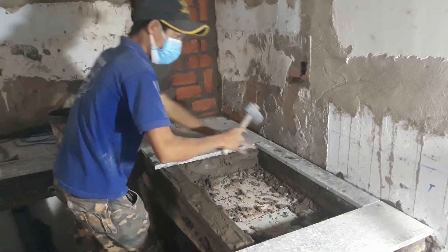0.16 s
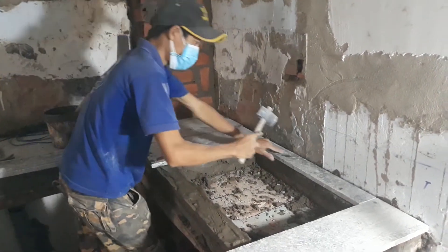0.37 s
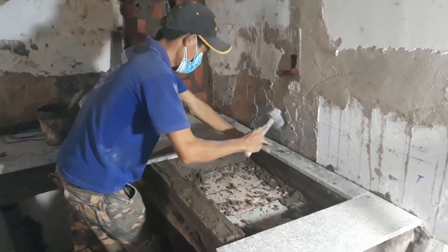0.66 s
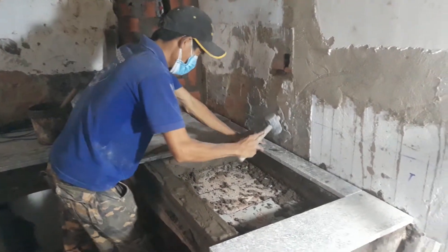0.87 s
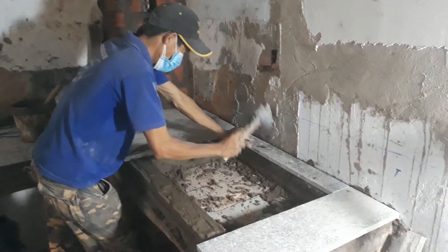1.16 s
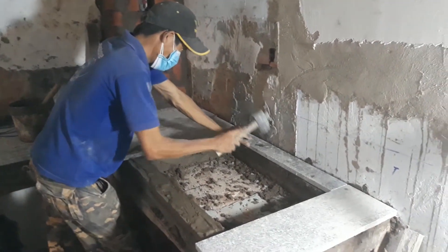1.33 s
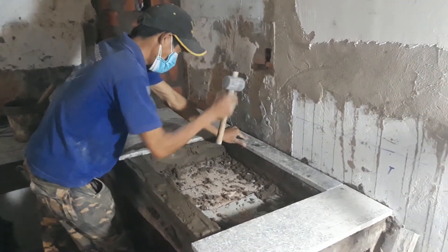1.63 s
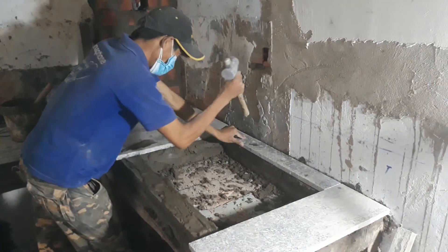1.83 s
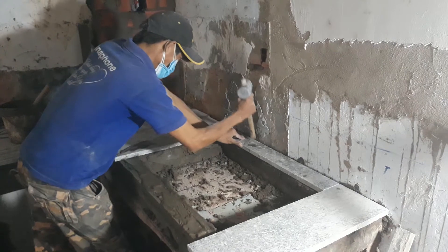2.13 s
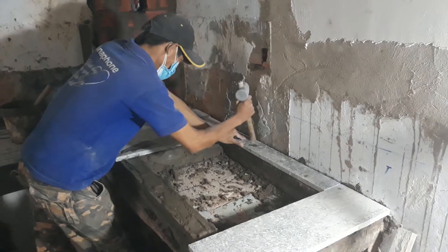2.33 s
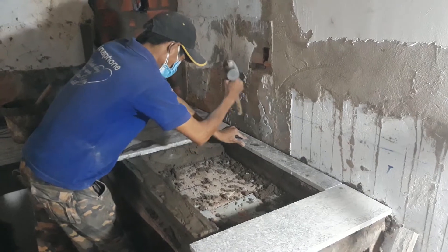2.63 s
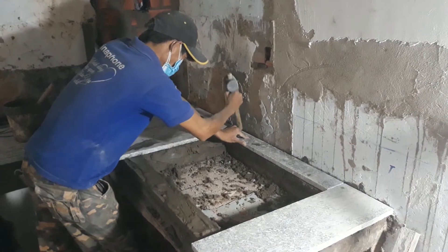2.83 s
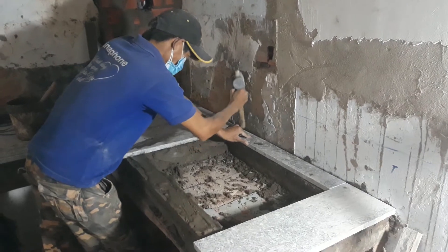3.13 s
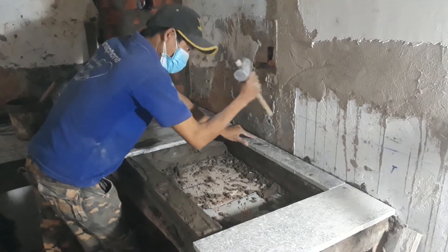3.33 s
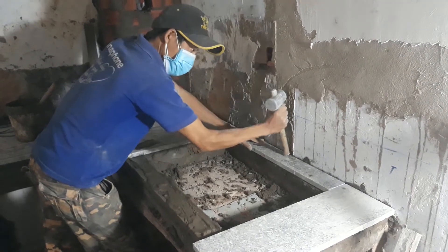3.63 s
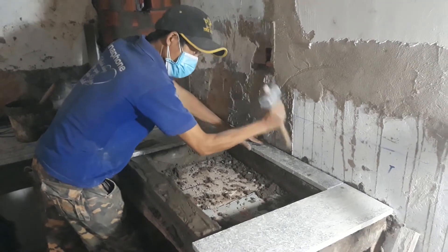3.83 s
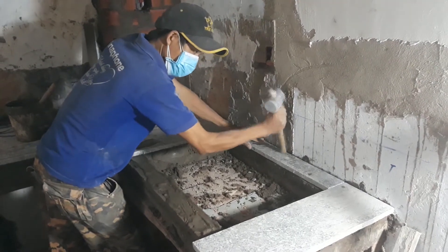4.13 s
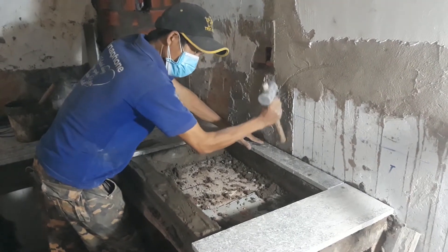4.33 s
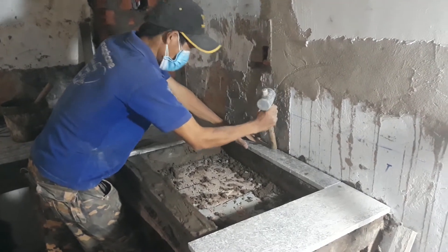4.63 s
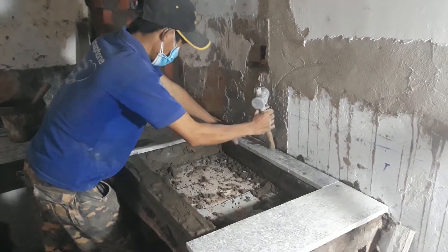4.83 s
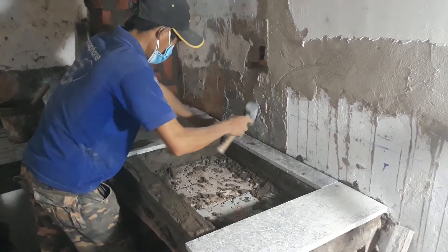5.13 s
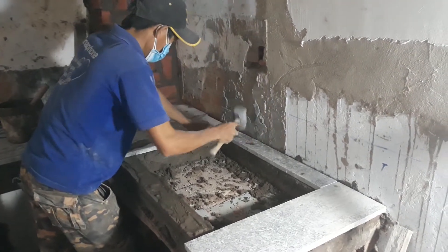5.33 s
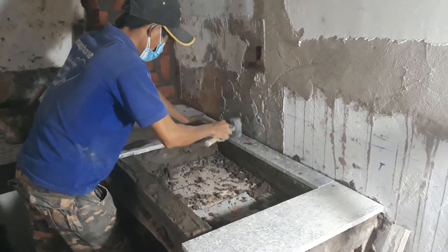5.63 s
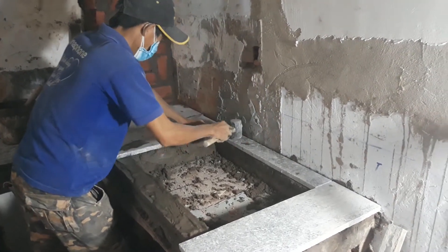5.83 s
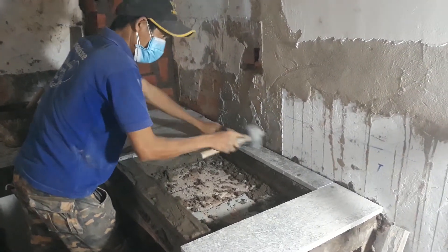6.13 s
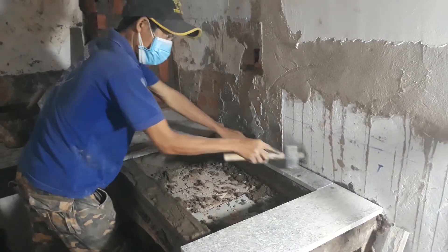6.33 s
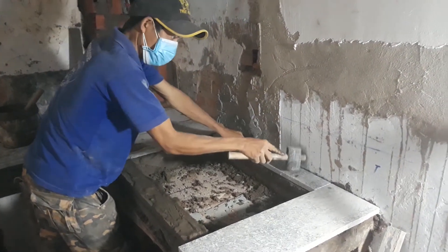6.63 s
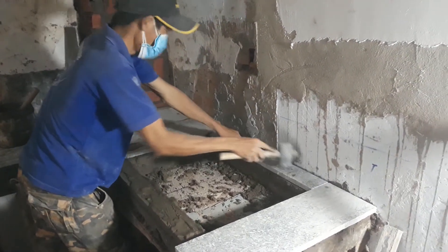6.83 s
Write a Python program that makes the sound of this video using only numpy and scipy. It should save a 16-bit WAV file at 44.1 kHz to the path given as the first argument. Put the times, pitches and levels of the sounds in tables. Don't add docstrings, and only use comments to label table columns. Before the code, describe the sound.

In a bare brick room, a hand scuffs over grit, then a stone strip lands with a hard clack and heavy settling thud. A mallet's wooden butt strikes it in about seven strong and a few lighter blows, each ringing briefly with short hard echoes. Soft dull rubber taps finish. Close microphone; faint distant machine hiss and hum dip after loud blows.

```python
import sys
import numpy as np
from scipy import signal
from scipy.fft import rfft, irfft, next_fast_len
from scipy.io import wavfile
from scipy.ndimage import uniform_filter1d, minimum_filter1d, map_coordinates

SR = 44100
rng = np.random.default_rng(int(sys.argv[2]) if len(sys.argv) > 2 else 0)


def convert_level_to_amplitude(level_db):
    exponent = np.asarray(level_db, float) / 20
    return 10 ** exponent


def bounce(signal):
    frames = np.transpose(np.atleast_2d(signal))
    limited = np.clip(frames, -1, 1)
    pcm = np.round(limited * 32767).astype(np.int16)
    wavfile.write(sys.argv[1], SR, pcm)


N = 308259
TIME = np.arange(N) / SR

# f/Hz,
# level/dB
WOOD_CLICK = [(1000, -30), (3300, -13), (4150, 0), (4900, -13), (5700, -14), (6300, -20), (7000, -17),
              (8500, -37), (10000, -62), (13500, -51), (16000, -64)]
# f/Hz, level/dB
RUBBER_CLICK = [(1000, -40), (3300, -20), (4150, -2), (4650, -7), (5250, 0), (6000, -6), (6800, -3),
                (8500, -23), (10000, -44), (13500, -23), (16000, -34)]
CLEAN_S, CRUSHED_S = 1e-5, .0015
QUICK_S, SLOW_S = .002, .02


def unit(x):
    return x / np.sqrt(np.mean(x ** 2) + 1e-20)


def along(points, hz):
    f, v = np.transpose(points)
    return np.interp(np.log(hz + 1), np.log(f + 1), v)


def wobble(rate):
    knots = rng.standard_normal(int(N * rate / SR) + 4)
    return map_coordinates(knots, [TIME * rate])


def noise(tone):
    m = next_fast_len(N + 8192)
    spectrum = rfft(rng.standard_normal(m)) * convert_level_to_amplitude(along(tone, np.fft.rfftfreq(m, 1 / SR)))
    return unit(irfft(spectrum, m)[:N])


def pulse(db, size=4096):
    ceps = irfft(np.log(convert_level_to_amplitude(db) + 1e-6), size)
    ceps[1:size // 2] *= 2
    ceps[size // 2 + 1:] = 0
    p = irfft(np.exp(rfft(ceps)), size)
    return p / np.linalg.norm(p)


def burst(seconds):
    b = rng.standard_normal(512) * np.exp(-TIME[:512] / seconds)
    return np.sign(b.sum()) * b / np.linalg.norm(b)


def room(walls_db, build_s):
    # t/s after the blow, level/dB
    first_echoes = [(.0015, 5), (.0058, 2), (0.0137, 4.5), (.021, 2.5), (.032, -0.5), (.05, -5)]
    # f/Hz, t60/s
    decay_times = [(60, 1), (150, 0.57), (400, 0.7), (1000, 0.53), (2300, 0.64), (4500, 0.47), (7000, 0.47),
                   (14000, 0.5)]
    hz, t, z = signal.stft(rng.standard_normal(SR), SR, nperseg=256)
    fading = convert_level_to_amplitude(-60 * t / along(decay_times, hz)[:, None])
    tail = signal.istft(z * fading, SR, nperseg=256)[1][:SR]
    tail *= 1 - np.exp(-TIME[:SR] / build_s)
    tail *= convert_level_to_amplitude(8.5) / np.linalg.norm(tail)
    for s, db in first_echoes:
        tail[round(s * SR):][:512] += convert_level_to_amplitude(db + walls_db) * burst(0.0025)
    return tail


def contacts(events, tone, modes, click_tone, click_s, build_s, gain_db, walls_db, spread_s):
    edge_per_soft = -0.44
    thump_db, thump_hz = 5, 231
    lead = 64
    out = np.zeros(N + 2 * SR)
    hz = np.fft.rfftfreq(4096, 1 / SR)
    low = 1 / (1 + (hz / 600) ** 2)
    high = 1 / (1 + (4000 / (hz + 1)) ** 4)
    rumble_cut_db = 20 * np.log10(1 + (92 / (hz + 1)) ** 5)
    thump = thump_db / (1 + (hz / thump_hz) ** 4)
    bending = np.exp(-4j * np.pi * spread_s * np.sqrt(1000 * hz) - 2j * np.pi * hz * lead / SR)
    same_spot = room(walls_db, build_s)
    for s, db, click_db, room_db, *soft_db in events:
        colour = along(tone, hz) + sum(soft_db) * (low + edge_per_soft * high) - rumble_cut_db
        ring_db = sum((lift_db + rng.normal(0, 1)) / (1 + (2 * (hz - c) / width) ** 2)
                      for c, width, lift_db in modes)
        ring = irfft(rfft(pulse(colour + ring_db + thump)) * bending)
        knock = irfft(rfft(pulse(colour + 0.41 * ring_db)) * bending)
        touch = irfft(rfft(pulse(along(click_tone, hz))) * bending)
        click = convert_level_to_amplitude(click_db) * np.convolve(touch, burst(click_s))[:len(ring)]
        answer = (same_spot + room(walls_db, build_s)) / np.sqrt(2)
        heard = convert_level_to_amplitude(room_db) * signal.fftconvolve(knock, answer)
        fade_out = np.cos(np.linspace(0, np.pi / 2, len(ring)) ** 4 / (np.pi / 2) ** 3)
        heard[:len(ring)] += (ring + click) * fade_out
        heard[:lead] *= np.hanning(2 * lead)[:lead]
        out[round(s * SR) - lead:][:len(heard)] += convert_level_to_amplitude(db + gain_db) * heard
    return out[:N]


def ducked_hiss(blows):
    # f/Hz, level/dB
    hiss_tone = [(25, -41.5), (80, -15), (115, -8), (230, -6.5), (450, -10.5), (720, -8.5), (1200, -4.5),
                 (1700, -1), (2500, -2.5), (3500, -13.5), (6900, -23), (8300, -28.5), (10000, -47),
                 (13500, -29), (16200, -32.5)]
    open_db = -43
    knee_db, share, attack_s, memory_s = -34, 0.49, 0.4, 1.42
    t = TIME[:3 * SR]
    memory = (1 - np.exp(-t / attack_s)) * np.exp(-(t / memory_s) ** 6)
    loud = np.abs(signal.fftconvolve(blows ** 2, memory / memory.sum())[:N])
    duck_db = -share * 10 * np.log10(1 + loud / convert_level_to_amplitude(2 * knee_db))
    swell_db = 1.5 * np.exp(-((TIME - 6.6) / 0.54) ** 2)
    unsteady_db = .3 * wobble(3) + .5 * wobble(20)
    return convert_level_to_amplitude(open_db + swell_db + duck_db + unsteady_db) * noise(hiss_tone)


def motor_hum():
    # from t/s, to t/s, harmonic order, level/dB
    loads = [
        (0.147, .9, 2, -58.5),
        (1.303, 2.1, 2, -59.5),
        (2.1, 5.0, 2, -61.5),
        (5.142, 5.42, 2, -61.5),
        (5.52, 6.9, 2, -63),
        (1.3, 1.55, 1, -48),
        (3.0, 3.6, 1, -70),
        (4.756, 5.3, 1, -63),
        (5.65, 6.8, 1, -63),
    ]
    idle_db, fade_s = -69.5, .05
    turn = 2 * np.pi * np.cumsum(116.6 * (1 + 0.0088 * wobble(5.6))) / SR
    hum = convert_level_to_amplitude(idle_db) * (np.sin(turn) + np.sin(2 * turn))
    for start, end, order, db in loads:
        load = np.clip(np.minimum(TIME - start, end - TIME) / fade_s + .5, 0, 1)
        hum += convert_level_to_amplitude(db) * load * np.sin(round(order) * turn)
    return hum


def draughts():
    # t/s, hold/s, level/dB
    gusts = [
        (1.223, 0.21, -52),
        (2.033, .05, -63),
        (2.402, 0.23, -62),
        (3.792, 0.057, -41),
        (3.994, .04, -65),
        (5.683, .08, -69),
        (5.82, .04, -89),
        (6.42, .03, -57),
        (6.75, .05, -98),
    ]
    calm_db, rise_s, fall_db_s = -75, 0.033, 65
    puffs = np.zeros(N)
    for s, hold, db in gusts:
        fall_db = fall_db_s * np.maximum(TIME - s - hold, 0)
        puffs += convert_level_to_amplitude(db - fall_db) * np.clip((TIME - s) / rise_s, 0, 1)
    rumble_tone = [(15, -76.5), (30, -31.0), (50, 2), (75, 1), (120, -4.5), (170, -21), (300, -68)]
    return (convert_level_to_amplitude(calm_db) + puffs) * noise(rumble_tone)


def grit_ticks():
    # t/s, level/dB
    ticks = [(.2534, -43), (3.76, -45), (3.85, -39), (3.8692, -38), (3.911, -36), (4.04, -45), (4.12, -40),
             (4.1366, -36), (4.3531, -37), (4.367, -36), (4.378, -40)]
    # f/Hz, level/dB
    grain_tone = [(300, 0), (1000, 13), (2500, -0.5), (4000, 2.5), (7000, 12.5), (10000, -58.5),
                  (13500, -21), (16000, -58)]
    events = [(s, db, 8, -8) for s, db in ticks]
    return contacts(events, grain_tone, [], RUBBER_CLICK, CRUSHED_S, QUICK_S,
                    gain_db=9, walls_db=-3, spread_s=.001)


def scuffs():
    # t/s, half length/s, level/dB
    rubs = [
        (0.268, 0.082, -54.5),
        (0.468, 0.063, -55),
        (0.62, 0.087, -58.5),
        (1.674, 0.055, -51),
        (3.34, .06, -67),
        (3.875, 0.036, -52),
        (4.138, 0.026, -54.5),
        (4.376, 0.025, -47),
        (4.84, 0.084, -62.5),
        (5.304, 0.1, -65),
    ]
    # f/Hz, level/dB
    rub_tone = [(1500, -18), (3500, 12), (7000, 7.5), (10000, -12.5), (13500, 1.5), (16000, -6)]
    stroke = sum(convert_level_to_amplitude(db) * np.exp(-((TIME - s) / half) ** 2) for s, half, db in rubs)
    return stroke * unit(convert_level_to_amplitude(2.1 * wobble(150)) * noise(rub_tone))


def far_knocks():
    # t/s, level/dB
    thuds = [
        (0.279, -47.5),
        (3.2, -66),
        (3.291, -52.5),
        (4.72, -42),
        (6.765, -35),
        (6.86, -51),
    ]
    # f/Hz, level/dB
    dull_tone = [(80, -31), (200, -11.5), (300, -1.5), (420, -2.5), (600, -10.5), (1200, -17.5),
                 (16000, -68)]
    events = [(s, db, -60, 3) for s, db in thuds]
    return contacts(events, dull_tone, [], WOOD_CLICK, CLEAN_S, SLOW_S,
                    gain_db=16, walls_db=-3, spread_s=.001)


def chirps():
    # from t/s, to t/s, from f/Hz, to f/Hz, level/dB
    glides = [
        (.9, 1.1, 5600, 5040, -64),
        (1.73, 1.82, 5250, 5450, -66),
        (1.7, 1.78, 13500, 12300, -70),
        (1.78, 1.87, 12300, 11900, -75),
        (3.37, 3.451, 1240, 1080, -57),
        (3.41, 3.513, 860, 860, -58),
        (3.423, 3.506, 292, 287, -56),
        (3.52, 3.57, 790, 814, -56),
        (6.5, 6.56, 6300, 6150, -59),
    ]
    out = np.zeros(N)
    for start, end, from_hz, to_hz, db in glides:
        u = np.clip((TIME - start) / (end - start), 0, 1)
        hz = (from_hz + (to_hz - from_hz) * u) * (1 + .014 * wobble(90))
        flutter_db = 4.5 * wobble(90) - 3
        swell = np.sqrt(np.abs(np.sin(np.pi * u))) * (u < 1)
        out += convert_level_to_amplitude(db + flutter_db) * swell * np.sin(2 * np.pi * np.cumsum(hz) / SR)
    return out


def strip_drop():
    # t/s, strength/dB, click/dB, room/dB, softness/dB
    touches = [
        (1.2270, -25.5, 2.2, -3, -13.5),
        (1.2285, -22.5, 2.7, -2, -9),
        (1.2304, -9, 0.5, -6.5, 7),
        (1.2499, -16.5, 3.6, -10.5, 29.5),
    ]
    # f/Hz, level/dB
    stone_tone = [(35, -65), (60, -16.5), (222, -4), (380, -9), (480, -17), (862, -13), (1660, -18),
                  (2580, -6.5), (4030, -6), (6280, -15), (6900, -8), (9790, -38.5), (13500, -36),
                  (16000, -40)]
    # f/Hz, width/Hz, lift/dB
    stone_modes = [(283, 56, 5), (890, 200, 12), (2510, 150, 13.5), (5140, 260, 18), (7300, 660, -11),
                   (13200, 900, 5)]
    # f/Hz, level/dB
    stone_touch = [(1000, -30), (3000, -16), (4300, -10), (5080, 0), (5900, -13), (7100, -8), (9800, -38),
                   (13200, -19), (16000, -36)]
    return contacts(touches, stone_tone, stone_modes, stone_touch, CLEAN_S, QUICK_S,
                    gain_db=17, walls_db=-4.5, spread_s=0.00064)


def butt_blows():
    # t/s, strength/dB, click/dB, room/dB
    first_blows = [
        (2.0125, -28, 0, -1.5),
        (2.0322, -0.45, -10, -0.74),
        (2.3344, -0.67, -9, -2.5),
    ]
    mid_blows = [
        (2.7738, -3.5, -11, -4.5),
        (3.0402, -6.5, -12.5, -3.5),
    ]
    near_blows = [
        (3.5830, 0, -4.5, -1.3),
        (3.8918, -1.5, 7.2, -4.5),
        (4.1596, -4.5, -2.8, -1.2),
        (4.4021, -3, -1, -3),
        (4.5637, -5.5, -6, -3.5),
    ]
    # f/Hz, level/dB
    first_tone = [(60, -21.5), (233, -4.5), (450, -8.5), (682, -11), (968, -12), (1410, -7.5), (1700, -5),
                  (2300, -4.5), (3120, -10), (3940, -20), (6900, -35.5), (10000, -59), (13500, -52.5),
                  (16000, -56)]
    mid_tone = [(35, -58), (60, -24), (142, -8), (274, -7), (380, -1.5), (527, -12), (803, -9.5),
                (1140, -11), (2190, -3), (2840, -6.5), (4320, -19), (6900, -33), (10000, -58.5),
                (13500, -50), (16000, -58.5)]
    near_tone = [(35, -74), (60, -22), (227, -4), (308, -10), (398, -1.5), (698, -7), (842, -8), (2140, 1),
                 (2900, -0.5), (4120, -12), (5200, -21.5), (7000, -26.5), (10300, -65), (13500, -50),
                 (16000, -47.5)]
    # f/Hz, width/Hz, lift/dB
    first_modes = [(238, 33, 2.4), (920, 150, 26), (1560, 30, 9.3), (1940, 64, 2.8), (2220, 170, 11),
                   (3134, 240, 16), (4000, 150, 4)]
    mid_modes = [(176, 69, 4.1), (423, 40, 6.6), (844, 150, 9.2), (1770, 200, 13), (2300, 110, 8.5),
                 (3110, 210, 9.7), (3940, 220, 1.9)]
    near_modes = [(228.6, 224, 16.8), (407, 40, 14.3), (586, 46, 12), (897, 195, 16.8), (1260, 15, 1.3),
                  (1690, 150, 3.6), (2130, 330, 4.5), (3250, 180, 10.4), (3810, 300, 1.6)]
    first = contacts(first_blows, first_tone, first_modes, WOOD_CLICK, CLEAN_S, QUICK_S,
                     gain_db=12, walls_db=-2.5, spread_s=0.00079)
    mid = contacts(mid_blows, mid_tone, mid_modes, WOOD_CLICK, CLEAN_S, QUICK_S,
                   gain_db=14, walls_db=-3.5, spread_s=0.00082)
    near = contacts(near_blows, near_tone, near_modes, WOOD_CLICK, CLEAN_S, QUICK_S,
                    gain_db=10.5, walls_db=-1.0, spread_s=0.000788)
    return first + mid + near


def head_taps():
    # t/s, strength/dB, click/dB, room/dB
    firm_taps = [
        (5.6348, -22.5, -9, -6.5),
        (5.7964, -15, -15, -9),
    ]
    soft_taps = [
        (6.3986, -25.5, -27, -12),
        (6.5752, -20.5, -31, -12),
        (6.7198, -21, -33, -11),
    ]
    # f/Hz, level/dB
    firm_tone = [(35, -26), (60, -1), (172, 0), (354, 0.5), (1200, -18), (1620, -13), (2710, -26),
                 (3190, -23.5), (3670, -26.5), (6900, -30), (16000, -65)]
    soft_tone = [(60, -63), (110, -0.5), (200, -2.5), (320, -3), (550, -19), (900, -21.5), (2000, -28.5),
                 (4300, -33), (8000, -44), (16000, -116)]
    # f/Hz, width/Hz, lift/dB
    firm_modes = [(176, 79, 9.3), (310.8, 19, 7.5), (760, 30, 7.1), (925, 120, 14), (1100, 140, 17),
                  (1630, 76, 15)]
    soft_modes = [(168, 40, 3.6), (215, 47, 11.7), (307, 26, 8.8), (757, 42, 13), (900, 69, 10.4),
                  (1100, 68, 8.9)]
    firm = contacts(firm_taps, firm_tone, firm_modes, RUBBER_CLICK, CLEAN_S, SLOW_S,
                    gain_db=17.5, walls_db=-0.5, spread_s=0.000684)
    soft = contacts(soft_taps, soft_tone, soft_modes, WOOD_CLICK, CRUSHED_S, SLOW_S,
                    gain_db=23, walls_db=-4, spread_s=0.00099)
    return firm + soft


def scene():
    blows = grit_ticks() + far_knocks() + strip_drop() + butt_blows() + head_taps()
    background = ducked_hiss(blows) + motor_hum() + draughts()
    return (background + blows + scuffs() + chirps())[None]


def top_cut(x):
    return signal.sosfilt(signal.butter(12, 16480, fs=SR, output="sos"), x)


def record(dry):
    need = np.minimum(1, .97 / (np.abs(dry) + 1e-9))
    held = dry * uniform_filter1d(minimum_filter1d(need, size=129), size=65)
    m = next_fast_len(N + 8192)
    in_band = np.fft.rfftfreq(m, 1 / SR) < 15900
    mix = irfft(rfft(held, m) * in_band, m)[:, :N]
    return top_cut(mix)


dry = scene()
out = record(dry)
bounce(out)
```